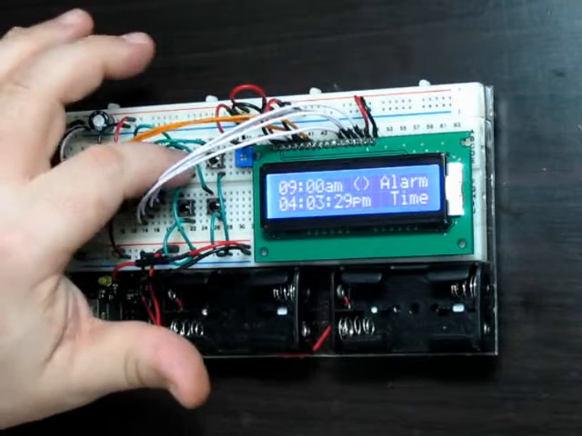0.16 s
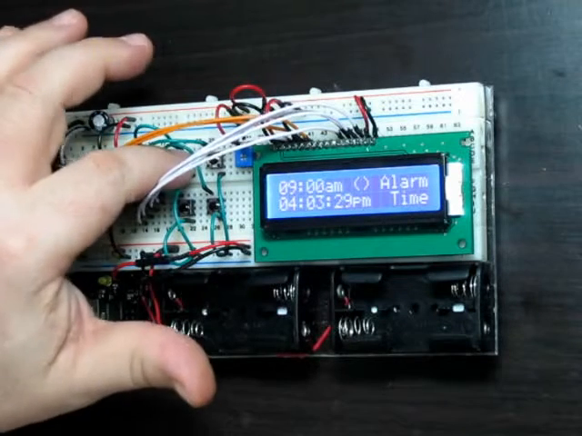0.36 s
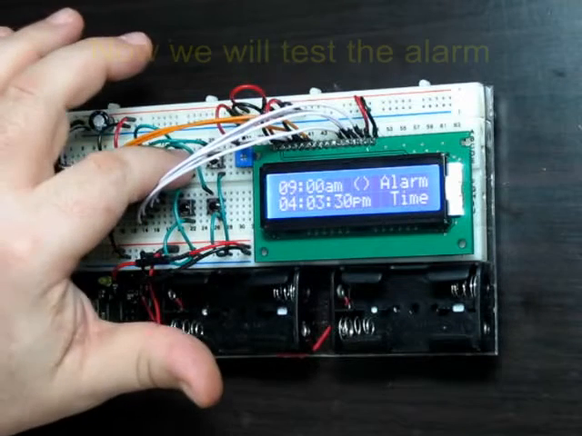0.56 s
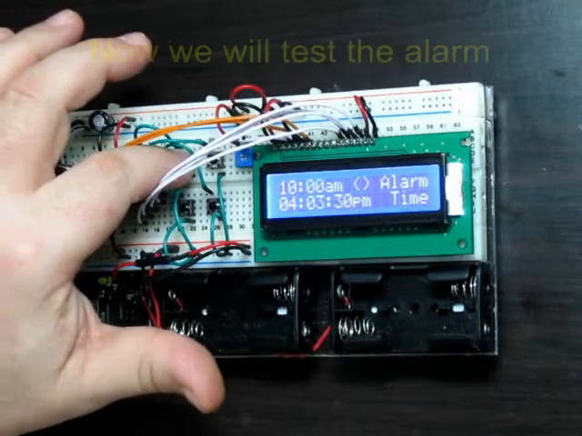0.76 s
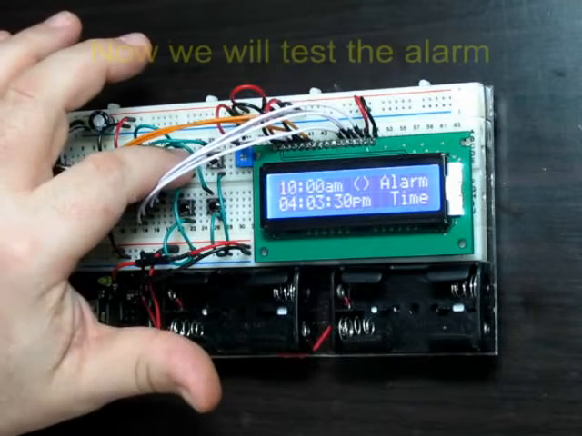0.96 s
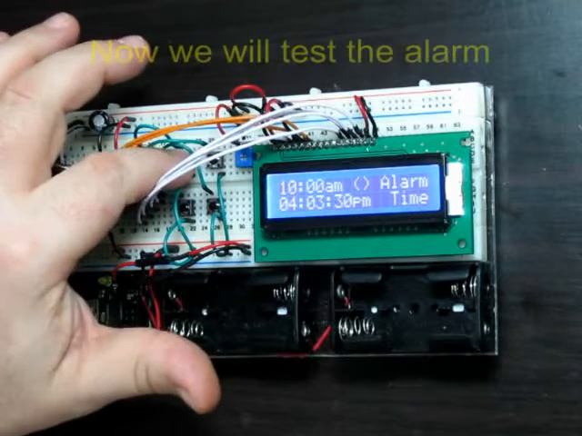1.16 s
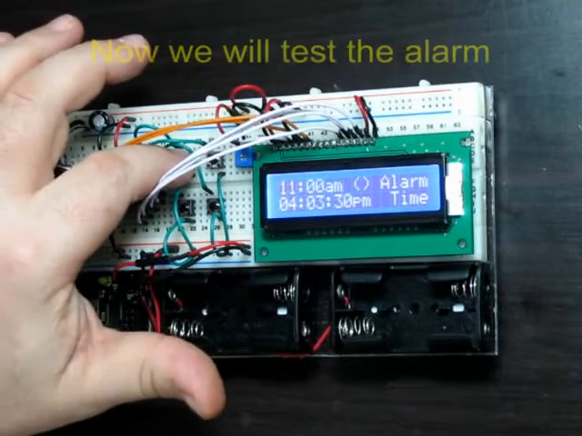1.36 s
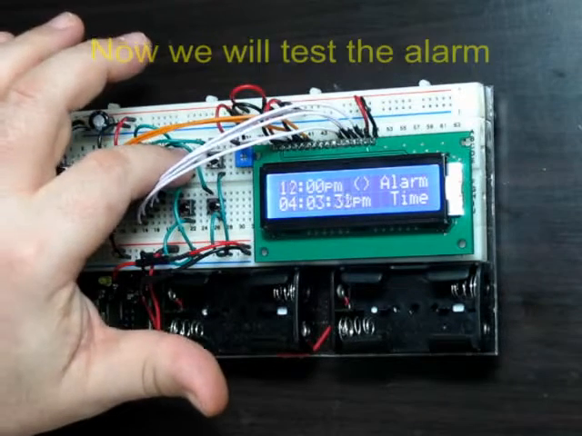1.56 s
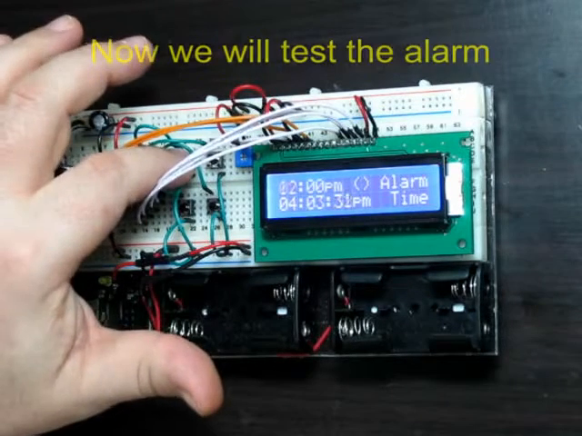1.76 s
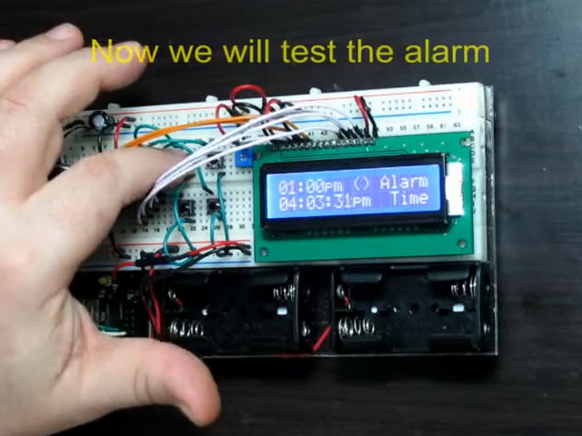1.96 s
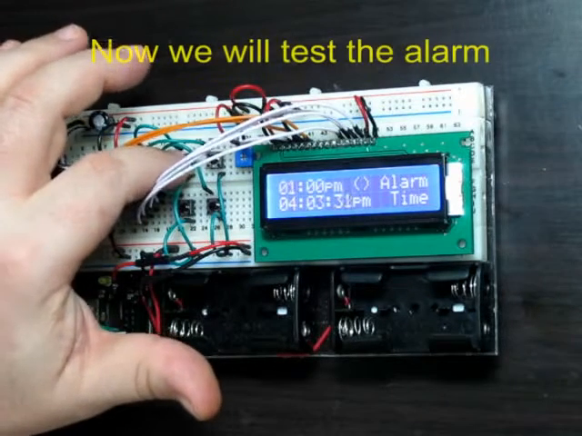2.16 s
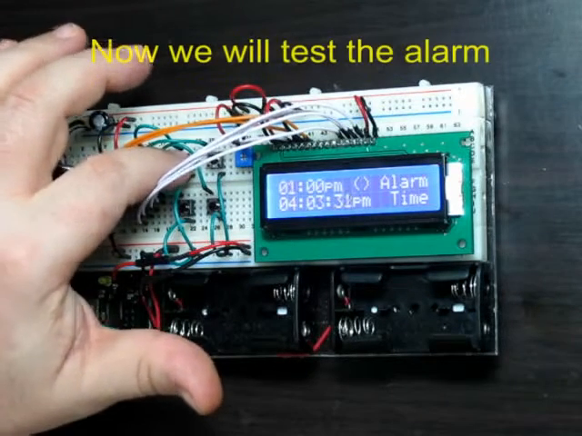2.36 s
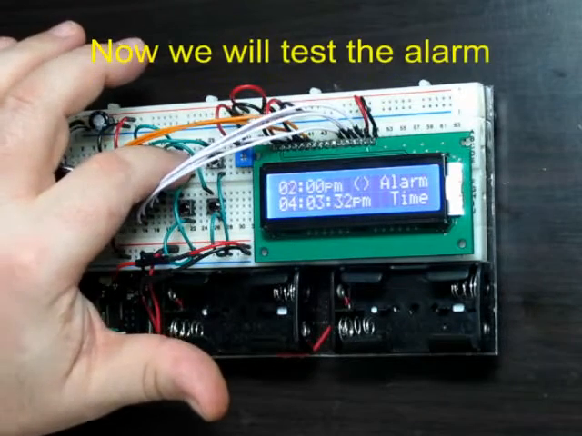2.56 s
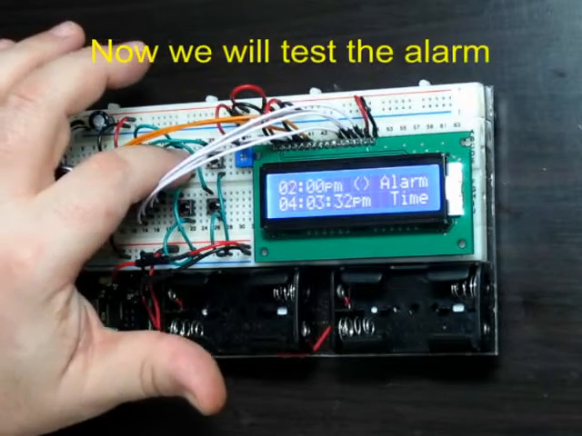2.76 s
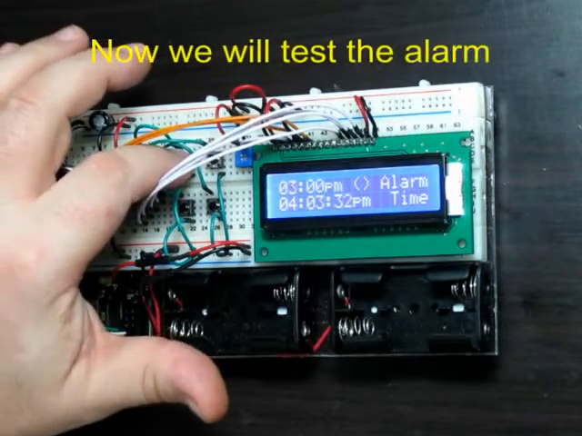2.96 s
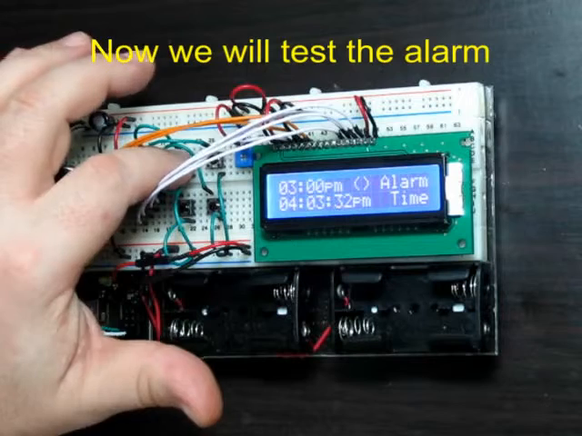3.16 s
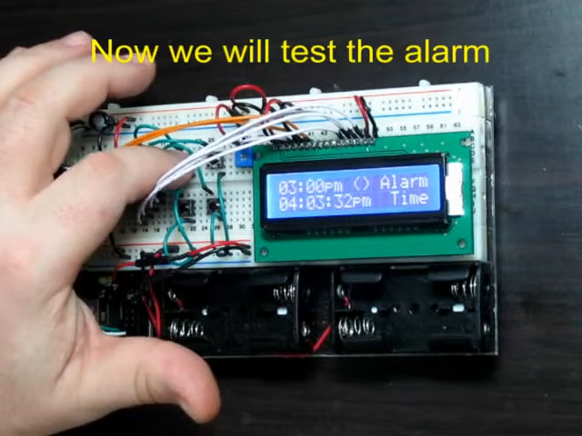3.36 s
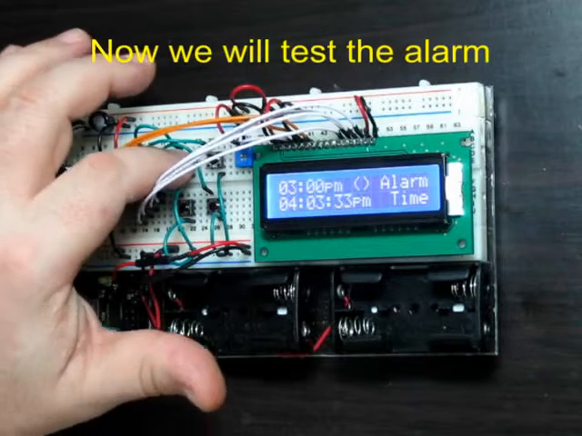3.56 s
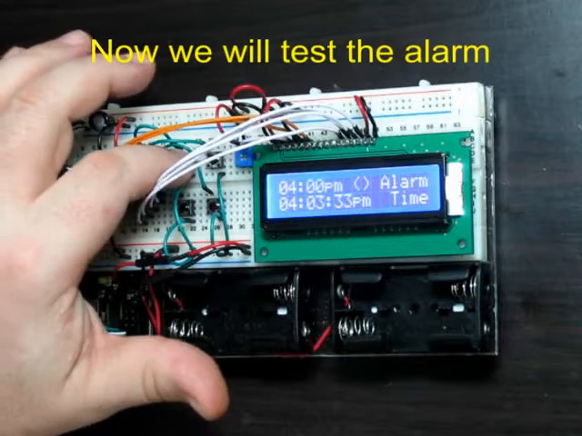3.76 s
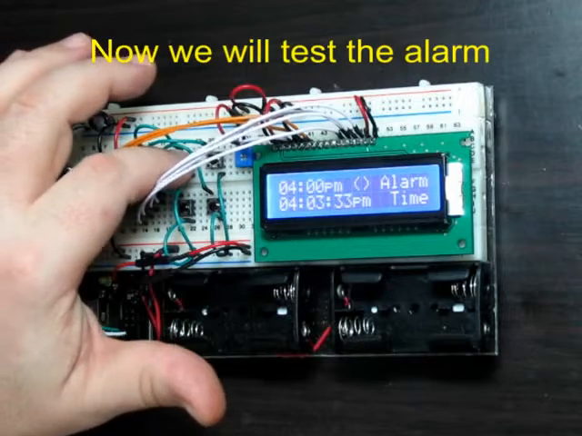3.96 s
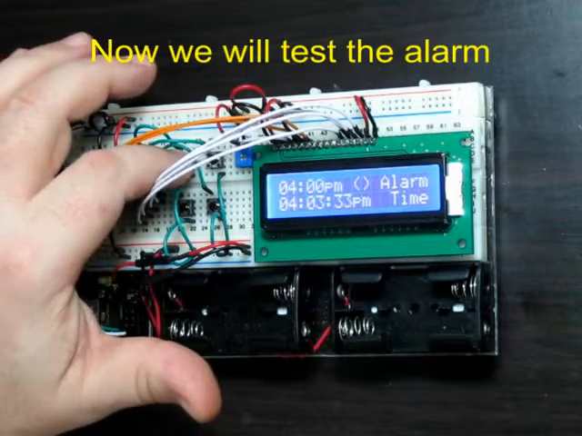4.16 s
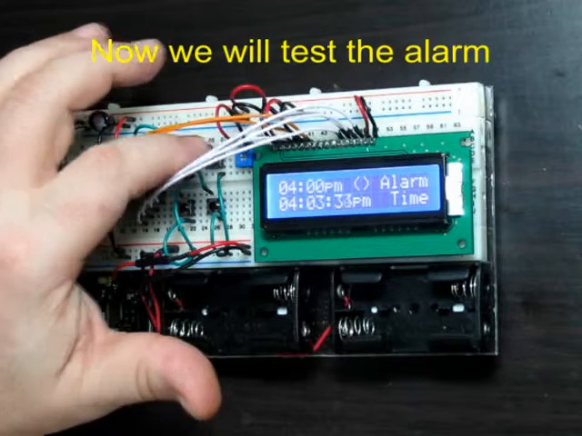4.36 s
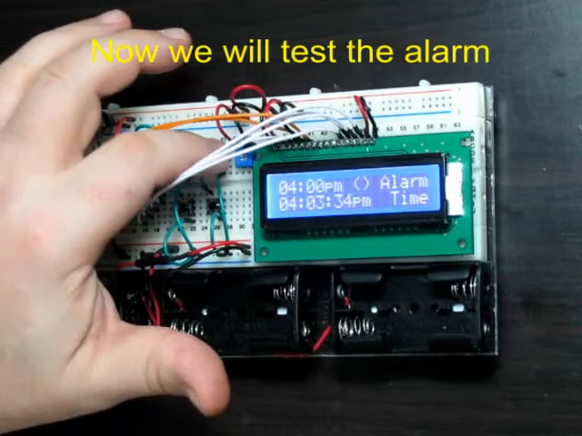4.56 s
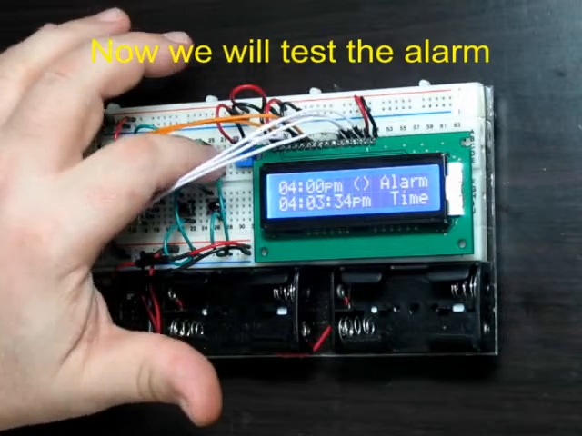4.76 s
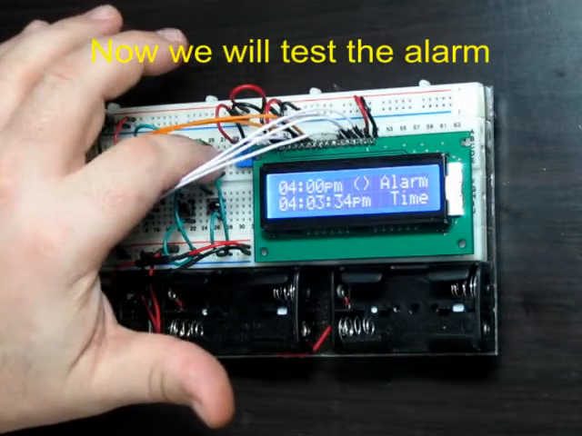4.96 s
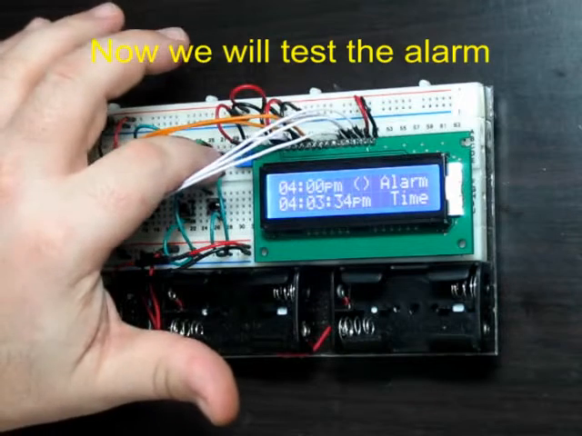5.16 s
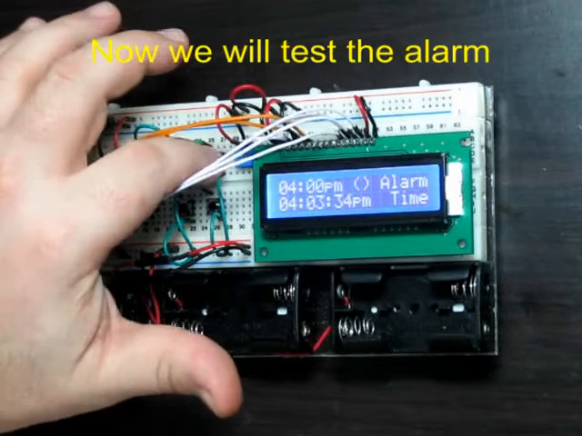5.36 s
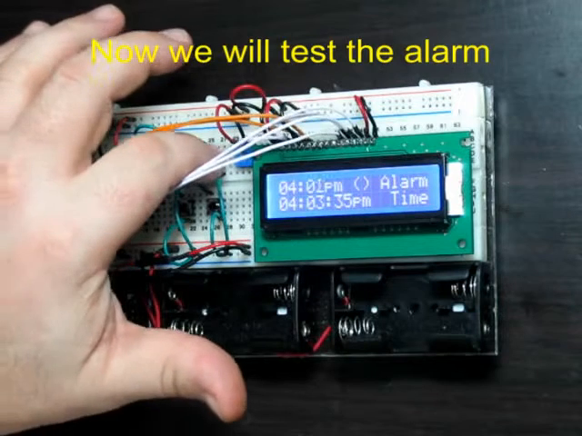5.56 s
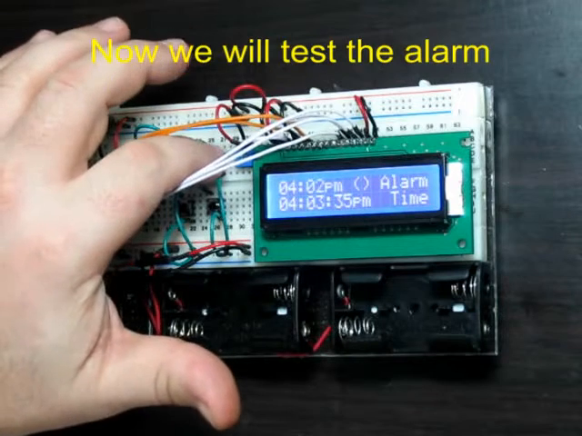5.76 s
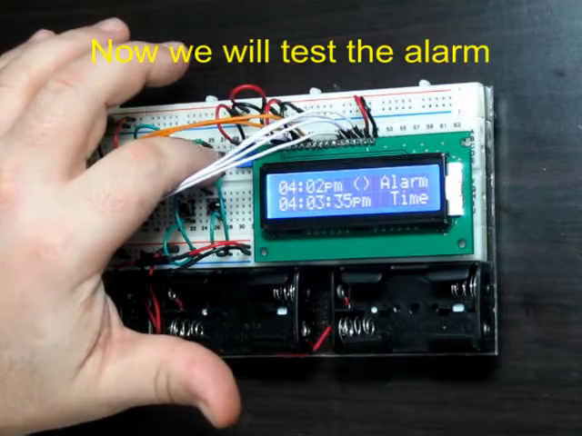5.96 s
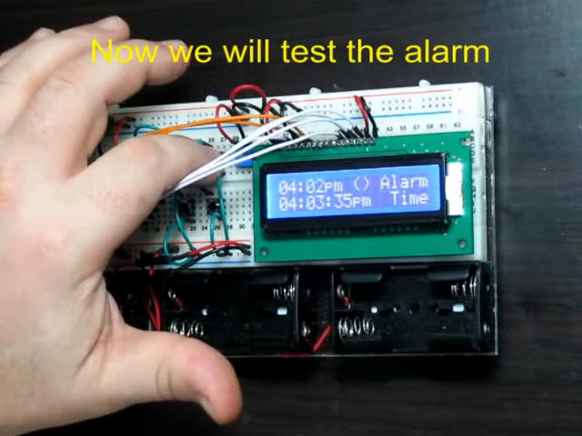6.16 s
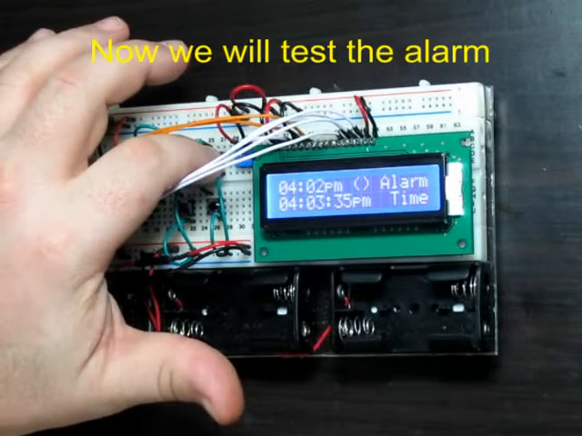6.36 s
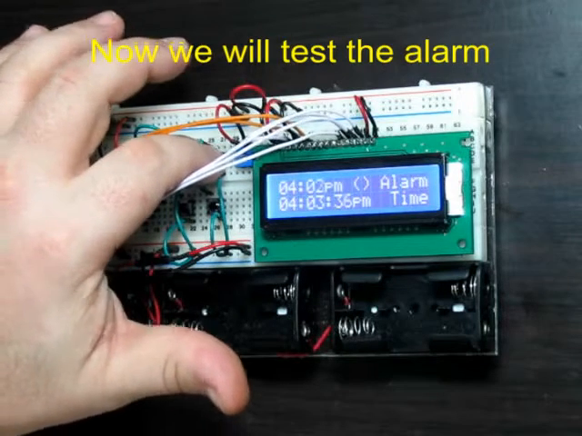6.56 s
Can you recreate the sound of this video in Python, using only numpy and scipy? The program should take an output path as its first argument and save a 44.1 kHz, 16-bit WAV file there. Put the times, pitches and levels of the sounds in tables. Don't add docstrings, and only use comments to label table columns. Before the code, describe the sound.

Steady airy fan noise with a low hum that swells and fades fills a small room. Over it, tiny buttons tick down and snap back about a sixth of a second later, with short bright cracks and low woody thuds. After seven pairs there is a pause, a brief rub of finger over wires, then two more widely spaced, thumpier pairs. Close, plain camera microphone with a short room tail.

```python
import sys
import numpy as np
from scipy import signal
from scipy.fft import rfft, irfft, next_fast_len
from scipy.io import wavfile
from scipy.ndimage import uniform_filter1d

SR = 44100
rng = np.random.default_rng(int(sys.argv[2]) if len(sys.argv) > 2 else 0)


def wav_record(signal):
    frames = np.transpose(np.atleast_2d(signal))
    bounded = np.clip(frames, -1, 1)
    quanta = np.round(bounded * 32767).astype(np.int16)
    wavfile.write(sys.argv[1], SR, quanta)


def to_linear_factor(level_db):
    exponent = np.asarray(level_db, float) / 20
    return 10 ** exponent


N = 291942
TIME = np.arange(N) / SR


def level(x, db):
    return x * to_linear_factor(db) / np.sqrt(np.mean(x ** 2))


def shaped(gain):
    size = next_fast_len(N)
    hz = np.maximum(np.arange(size // 2 + 1) * SR / size, 1)
    spectrum = rfft(rng.standard_normal(size)) * gain(hz)
    return irfft(spectrum, size)[:N]


def ringing(hz, width_hz):
    return level(shaped(lambda f: 1 / np.hypot(1, (f - hz * hz / f) / width_hz)), 0)


def walk(rate_hz):
    hold = int(SR / rate_hz)
    steps = np.repeat(rng.standard_normal(N // hold + 1), hold)
    slewed = uniform_filter1d(uniform_filter1d(steps, hold), hold)
    return 1.3 * slewed[:N]


def swells(rows, rise_s, fall_s):
    start, hold, db = np.transpose(rows)[:, :, None]
    early = np.maximum(start - TIME, 0) / rise_s
    late = np.maximum(TIME - start - hold, 0) / fall_s
    return to_linear_factor(db[:, 0]) @ np.exp(-early ** 2 - late ** 2)


# pitch_hz, level_db (per Hz)
FAN_AIR = [(18, -52.5), (30, -17), (59, -11.5), (135, -6.5), (230, -8), (322, -4), (450, -4.5), (769, -4.5),
           (1000, -8.5), (1200, -14), (1590, -18.5), (3000, -26), (7300, -33), (12000, -42.5)]
# pitch_hz, width_hz, level_db
FAN_RINGS = [(144, 16, -55.5), (237, 75, -52), (335, 20, -47.5), (613, 32, -59.5), (771.3, 20, -49.5),
             (944, 34, -52), (1031, 7.1, -59.5)]


def fan():
    hz, db = np.transpose(FAN_AIR)
    air = level(shaped(lambda f: to_linear_factor(np.interp(np.log(f), np.log(hz), db))), -39)
    air = air * to_linear_factor(.25 * walk(3))
    rings = np.zeros(N)
    for ring_hz, width_hz, ring_db in FAN_RINGS:
        rings += to_linear_factor(ring_db + 1.43 * walk(2.966)) * ringing(ring_hz, width_hz)
    return air + rings


# start_s, hold_s, level_db
DRONE_SWELLS = [
    (-.1, 0.27, -51),
    (.62, 0.34, -49),
    (1.35, 0.4, -46),
    (2.05, 0.67, -45),
    (2.9, 0.31, -42),
    (3.6, 0.11, -46),
    (3.98, 0.089, -51),
    (4.95, 0.6, -49),
    (6.45, .3, -46),
]


def drone():
    hz = 90.3 + 1.5 * walk(5)
    rest_db = -59.5
    gain = to_linear_factor(rest_db) + swells(DRONE_SWELLS, rise_s=0.069, fall_s=.12)
    tone = np.sin(2 * np.pi * np.cumsum(hz) / SR)
    return gain * tone * to_linear_factor(2.5 * walk(8) - 5)


# start_s, hold_s, level_db
SLIDES = [
    (4.45, 0.4, -69),
    (4.84, .08, -53),
]


def slide():
    rub = shaped(lambda f: 1 / (1 + ((f - 2600.0 ** 2 / f) / 2200.0) ** 2))
    catches = to_linear_factor(2.0 * walk(60) - 2)
    return swells(SLIDES, rise_s=0.036, fall_s=.09) * catches * level(rub, 0)


def room(x, wet_db, t60):
    t = TIME[:int(.5 * SR)]
    build = np.clip(t / 0.002 - .5, 0, 1)
    tail = rng.choice([-1, 1], len(t)) * np.exp(-np.log(1000) * t / t60) * build
    tail = np.diff(tail)
    return x + to_linear_factor(wet_db) * signal.fftconvolve(x, tail / np.linalg.norm(tail))[:N]


def dome_burst():
    t60_ms, band_hz = 3.7, [3550, 6870]
    t = TIME[:int(SR / 50)]
    noise = rng.standard_normal(len(t)) * np.exp(-np.log(1000) * t * 1000 / t60_ms)
    band = signal.butter(2, band_hz, "band", fs=SR, output="sos")
    return to_linear_factor(-29) * signal.sosfilt(band, noise)


def strike(out, s, hz, t60, gain, rise_s):
    first = int(s * SR) + 1
    last = min(first + int(SR * t60.max()), N)
    t = (np.arange(first, last) / SR - s)[:, None]
    shape = np.exp(-np.log(1000) * t / t60) * (1 - np.exp(-t / rise_s))
    out[first:first + len(t)] += (np.sin(2 * np.pi * hz * t) * shape) @ gain


# pitch_hz, t60_ms, press_db, release_db, first_swing (signed size)
BOARD = [(1600, 39, -38, -47.5, 0.9), (2133, 11.2, -28.5, -27, -0.72), (2806, 11.8, -32.5, -27.5, 0.95),
         (3280, 6.2, -26, -28.5, -0.93), (3800, 4.2, -31, -36.5, 0.99), (4630, 6.4, -40.5, -37, -1.2),
         (5400, 3.3, -38.5, -52.5, 0.72), (6380, 8.4, -46, -45.5, -0.81), (7680, 3.3, -42, -43, -1.18)]
# pitch_hz, t60_s, press_db, release_db, first_swing (+-1)
DESK = [(70, .13, -52, -42, 1), (111, .09, -43, -54, 1), (124.9, .88, -52, -40.5, -1),
        (137.5, .28, -34, -26, -1), (154.1, .21, -60, -38.5, 1), (170.3, .9, -57, -44.5, -1),
        (191.6, .31, -46, -46.5, -1), (203.3, .27, -44.5, -38, 1), (216.5, .8, -62, -51.5, 1),
        (229.3, .3, -36, -29, -1), (247, .8, -51.5, -48, -1), (258.6, .24, -33.5, -28, 1),
        (268.8, .41, -41.5, -37, -1), (300.3, .39, -40.5, -39.5, 1), (309, .8, -49.5, -58, 1),
        (329.9, .11, -28, -26.5, 1), (346.2, .13, -33, -36.5, -1), (366.2, .34, -38.5, -39.5, 1),
        (408.8, .14, -44, -41, 1), (445, .05, -35, -42, -1), (520, .3, -45, -50, -1)]
# pitch_hz, t60_s, level_db, delay_s
HOLLOW = [(1540, .02, -40, .0062), (1450, .05, -50, .0062)]


def snaps(events, column, push, lag_ms, contact_ms):
    board, desk, hollow = np.transpose(BOARD), np.transpose(DESK), np.transpose(HOLLOW)
    is_ring = np.arange(len(BOARD)) < 2
    next_button_s = 4.85
    tick_lead_s = .3 / 1000
    first_contact_db = -2.5
    tick, knock = np.zeros(N), np.zeros(N)
    chance = rng.standard_normal((len(events), len(BOARD), 2))
    for (s, ring_db, crack_db, knock_db), draw in zip(events, chance):
        db = board[column] + np.where(is_ring, ring_db, crack_db) + .8 * draw[:, 0]
        hz = board[0] * (1 + .008 * draw[:, 1])
        t60 = board[1] / 1000
        gain = -push * board[4] * to_linear_factor(db)

        touch = s - tick_lead_s
        second_touch = touch + contact_ms[int(s > next_button_s)] / 1000
        burst = to_linear_factor(crack_db) * dome_burst()
        start = int(touch * SR)
        tick[start:start + len(burst)] += burst
        strike(tick, touch, hz, t60, gain * to_linear_factor(first_contact_db), rise_s=.0001)
        strike(tick, second_touch, hz, t60, gain, rise_s=.0001)

        hollow_gain = to_linear_factor(hollow[2] + ring_db)
        strike(knock, s + hollow[3, 0], hollow[0], hollow[1], hollow_gain, rise_s=0.00043)
        desk_gain = push * desk[4] * to_linear_factor(knock_db + desk[column])
        strike(knock, s + lag_ms / 1000, desk[0], desk[1], desk_gain, rise_s=.0001)
    return tick, knock


# start_s, ring_db (board), crack_db, knock_db (desk)
PRESSES = [
    (.4691, 1.5, -2, 0.5),
    (1.0504, 1.5, 3.5, 0),
    (1.3017, 3.5, -0.5, 0.5),
    (1.5912, 0, 0.5, -0.5),
    (2.2315, -1.5, -4.5, 1),
    (2.6455, -1, -4, -0.5),
    (3.4214, 2.5, -0.5, 0.5),
    (5.2446, 2, -4.5, 4.5),
    (6.3834, -2, -7, 5),
]
# first_button_ms, other_button_ms
PRESS_CONTACT_MS = (0.434, 0.92)


def presses():
    return snaps(PRESSES, column=2, push=1, lag_ms=0.38, contact_ms=PRESS_CONTACT_MS)


# start_s, ring_db (board), crack_db, knock_db (desk)
RELEASES = [
    (.6325, 1, -0.5, 1.5),
    (1.1711, 3, 1.5, 0.5),
    (1.4648, 4.5, 5, 1),
    (1.7144, 1.5, 0.5, 0.5),
    (2.3614, -1.5, -5.5, 2.5),
    (2.7986, -2.5, -4.5, 2),
    (3.5947, 1.5, -2, 3),
    (5.4764, 2, -1.5, 3),
    (6.5000, 1.5, -2.5, 2.5),
]
# first_button_ms, other_button_ms
RELEASE_CONTACT_MS = (0.539, 0.91)


def releases():
    return snaps(RELEASES, column=3, push=-0.91, lag_ms=1, contact_ms=RELEASE_CONTACT_MS)


def scene():
    press_tick, press_knock = presses()
    release_tick, release_knock = releases()
    ticks = room(press_tick + release_tick, wet_db=3.0, t60=0.23)
    knocks = press_knock + release_knock
    return (ticks + knocks + fan() + drone() + slide())[None]


def band_limit(x):
    return signal.sosfilt(signal.butter(12, 9910, fs=SR, output="sos"), x)


def record(dry):
    thin = signal.sosfilt(signal.butter(2, 30, "high", fs=SR, output="sos"), dry)
    droop = signal.sosfilt(signal.butter(4, 8360, fs=SR, output="sos"), thin)
    cut = signal.sosfilt(signal.ellip(10, .2, 60, 9880, fs=SR, output="sos"), droop)
    mix = cut - .0117
    return band_limit(mix)


dry = scene()
out = record(dry)
wav_record(out)
```